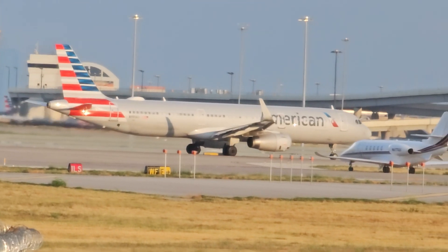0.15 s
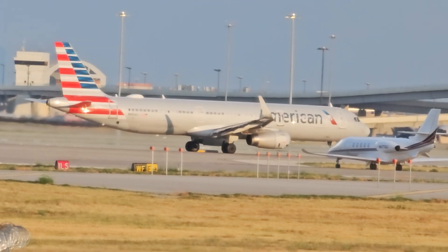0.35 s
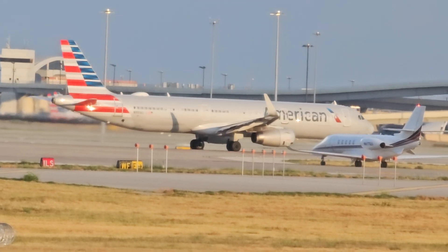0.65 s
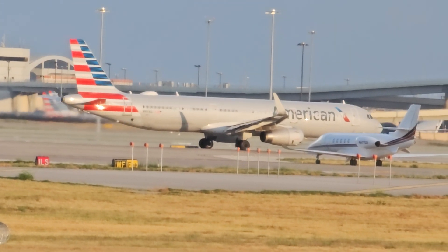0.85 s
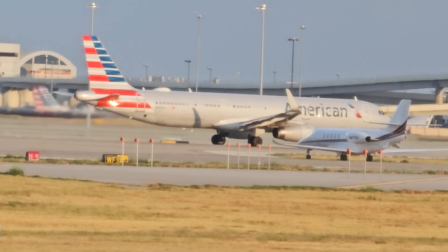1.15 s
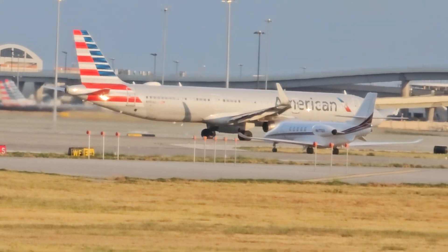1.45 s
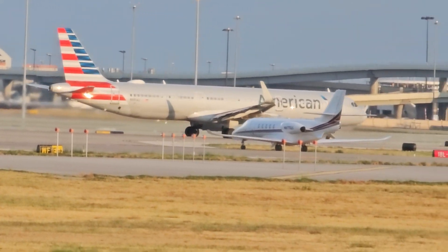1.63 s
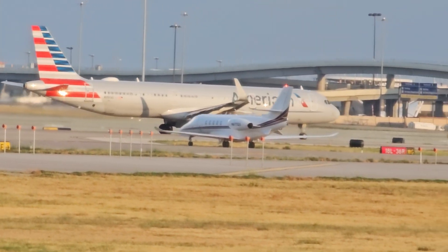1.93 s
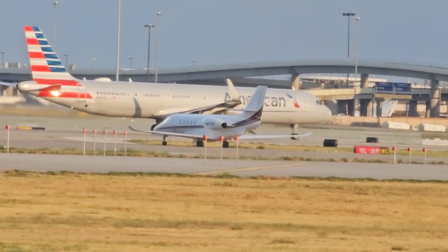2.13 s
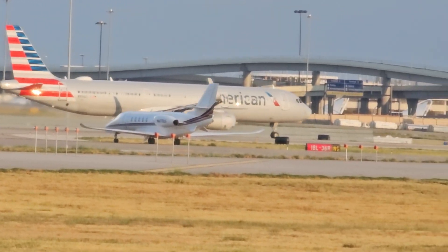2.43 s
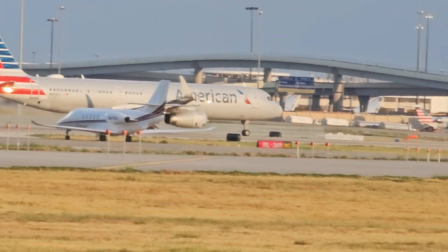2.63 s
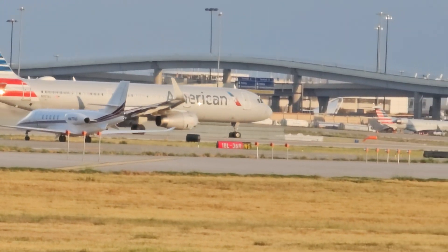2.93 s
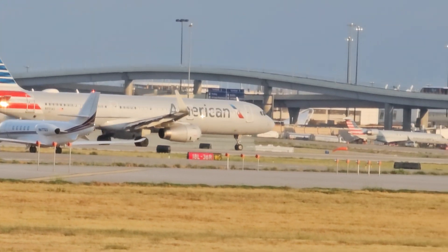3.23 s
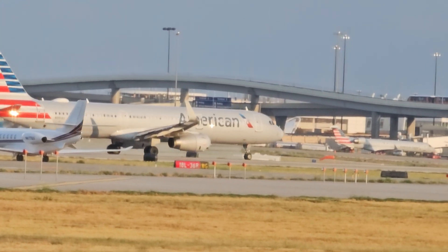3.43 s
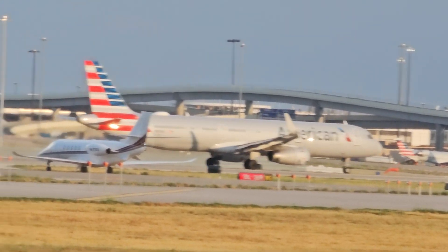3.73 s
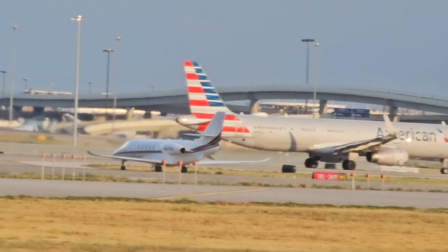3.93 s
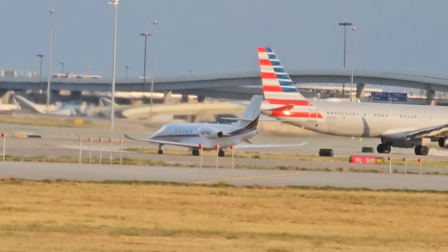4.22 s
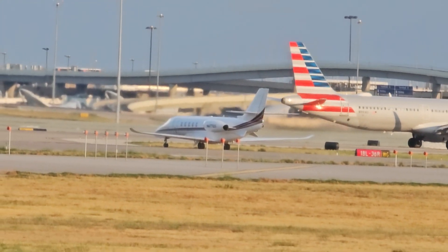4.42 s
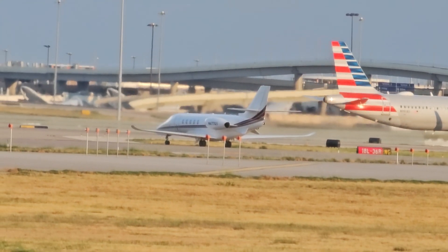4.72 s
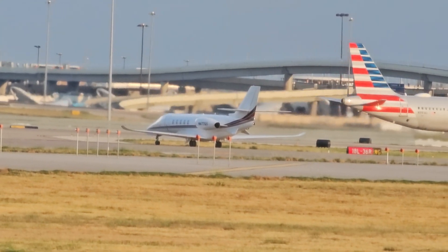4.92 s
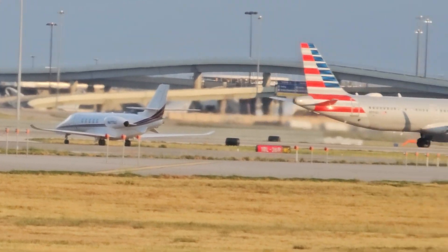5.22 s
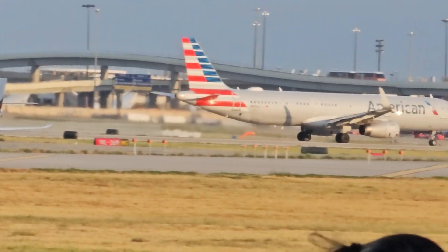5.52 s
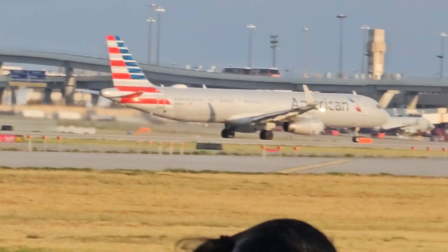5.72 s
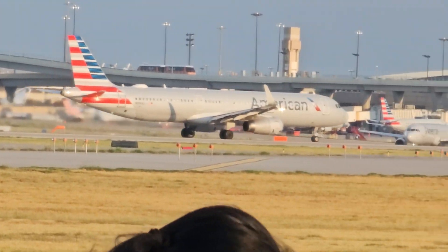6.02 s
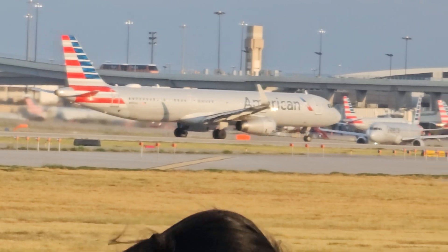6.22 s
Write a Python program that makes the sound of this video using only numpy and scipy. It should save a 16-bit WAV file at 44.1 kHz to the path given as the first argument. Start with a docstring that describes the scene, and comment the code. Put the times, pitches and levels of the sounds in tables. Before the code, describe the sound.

A distant airliner spools up, its rising whine giving way to a sustained roar with deep rumble and broad hiss.

```python
"""A dry grass field beside a runway, where a distant airliner opens its throttles and rolls.
Its fans whine upward and are masked by the turbulent exhaust: deep rumble, then roar and hiss coloured
by a ground reflection. Other engines idle to the right, and the roar echoes from that side.
A breeze rustles the grass and thumps the microphone; a limiter holds down the loudest swells."""
import sys
import numpy as np
from scipy import signal
from scipy.fft import rfft, irfft, next_fast_len
from scipy.io import wavfile
from scipy.ndimage import uniform_filter1d, minimum_filter1d, map_coordinates

SR = 44100
rng = np.random.default_rng(int(sys.argv[2]) if len(sys.argv) > 2 else 0)


def put_to_file(sound):
    """Save the sound as 16-bit audio at rate SR, in the file named by the first command-line argument."""
    columns = np.atleast_2d(sound).T  # one column per channel
    safe = np.clip(columns, -1, 1)
    whole_steps = np.round(safe * 32767)
    wavfile.write(sys.argv[1], SR, whole_steps.astype(np.int16))


N = 280476

# Correlation between the ears, in general and for sounds from the right: frequency_hz, coherence
COHERENCE = [(25, 0.82), (60, 0.91), (160, 0.97), (270, 1), (450, 0.87), (740, 1), (1220, 1), (2100, 0.95),
             (3400, 0.8), (5500, 0.48), (9000, .5)]
RIGHT_COHERENCE = [(100, .3), (400, 0.93), (2000, 0.63), (6000, 0.28), (15000, 0.23)]
# Spectra of wind on the microphone, grass and the idling engines' rush: frequency_hz, density_db
BUFFET_SPECTRUM = [(5, -43.5), (14, -17.5), (22, -2.5), (31, 1.5), (39, -1), (50, -3.5), (90, -48),
                   (300, -120)]
GRASS_SPECTRUM = [(1000, -61), (4000, -5), (6000, -2), (6900, -7), (8200, -3.5), (9200, 0.5), (10300, -7),
                  (11300, -3), (12000, -6), (14000, -9), (15800, -13)]
IDLE_SPECTRUM = [(40, -6), (110, 6), (200, 3), (290, 0), (400, 5), (560, -1.5), (780, -6), (900, -6.5),
                 (1050, -2.5), (1500, -11), (1950, -14), (2300, -8), (2650, -21), (3400, -19),
                 (4300, -18.5), (5200, -30), (9000, -68.5)]
# Puffs on the microphone, and one lull: centre_s, half_width_s, gain_db
MICROPHONE_PUFFS = [(.4, .06, 15), (1.91, .07, 9), (2.2, .13, 5), (2.58, .11, 8), (2.95, .15, 5),
                    (3.45, .15, 6), (4.3, .6, -5), (5.08, .08, 6), (6.2, .18, 7)]
# Gusts in the grass: centre_s, half_width_s, gain_db
GRASS_GUSTS = [(.88, 0.12, 2.5), (1.6, 0.15, 3), (2.0, .13, 2.5), (4.8, 0.65, 2.5)]
# Balance of the nearest tuft, on the right: frequency_hz, left_minus_right_db
TUFT_BALANCE = [(5000, -9.5), (6800, -4.5), (8200, -6), (9300, -10), (10500, -13.5), (11700, -1),
                (14000, -1.5), (15500, -7.5)]
# Single stalks flicking: start_s, level_db, left_minus_right_db
STALK_FLICKS = [(1.1029, -47, -5), (1.6633, -43.5, -6.5), (1.8622, -48, -8), (2.1752, -42, -2.5),
                (2.9949, -46, -7), (3.2615, -47.5, -9), (4.594, -47.5, -9.5), (4.7277, -44.5, -8),
                (4.8609, -46, -7), (5.1284, -45, -7)]
# Tones of the idling engines: pitch_hz, gain_db, phase_scatter_rad
IDLE_TONES = [(394, 5.5, .3), (768, 0, .6)]
# Those tones swelling on the wind: centre_s, half_width_s, gain_db
HUM_SWELLS = [(.26, .15, 8.5), (.6, .14, 10), (1.35, .26, 7), (2.3, .5, 7.5)]
# The fan whine swelling through the roar: centre_s, half_width_s, blade_tone_db, octave_db
WHINE_SWELLS = [(.2, .07, 6.5, 0), (.5, .07, 8, 0), (1.11, .06, 0, 9), (1.2, .06, 11.5, 3),
                (1.29, .09, 2.5, 8.5), (1.38, .075, 15.5, 1), (1.52, .085, 12.5, 7.5), (1.82, .13, 16.5, 4)]
# Spectra of the exhaust layers, large eddies to small: frequency_hz, density_db
DEEP_SPECTRUM = [(10, -59), (30, -19), (42, -8.5), (52, -5.5), (59, -3.5), (67, 0), (76, -5.5), (90, -6.5),
                 (130, -48), (400, -120)]
RUMBLE_SPECTRUM = [(30, -57.5), (70, -23.5), (88, -3.5), (105, 2), (118, -1), (138, -5.5), (165, -10),
                   (200, -17.5), (300, -55), (800, -120)]
BOOM_SPECTRUM = [(40, -72.5), (120, -14), (170, -6.5), (210, 0.5), (265, -1), (320, -6.5), (365, -12.5),
                 (420, -13.5), (700, -62.5), (2000, -120)]
ROAR_SPECTRUM = [(100, -50), (300, -2.5), (450, -6), (520, 0.5), (680, 1.5), (800, 1.5), (900, -3),
                 (1020, -9), (1130, -5), (1300, -4), (1650, -6.5), (1930, -12.5), (2150, -11),
                 (2400, -15.5), (2900, -43), (7000, -120)]
HISS_SPECTRUM = [(500, -79), (1500, -11), (2400, -5.5), (2900, 3.5), (3400, -1), (4000, -3), (4600, -10.5),
                 (5300, -17.5), (6200, -31), (7200, -44.5), (15000, -69.5)]
# Growth with thrust, by layer name: idle_db, full_db, middle_s, rise_s, turn_gain_db
THRUST_LEVELS = {"deep": (-39.5, -11, 1.16, 0.48, 1.5), "rumble": (-34, -15, 1.48, 0.44, 1),
                 "boom": (-42.5, -19, 1.06, 0.56, 4), "roar": (-40.5, -20.5, 1.5, 0.53, -2),
                 "hiss": (-51.5, -37, 1.78, 0.42, -2)}
# How far the nozzles point at the listener: time_s, turn_fraction
NOZZLE_TURN = [(3.3, 0), (3.9, 0.36), (4.4, 0.82), (5.2, 1), (5.6, 0.87), (6.36, 0.2)]
# Spectra drift up, then sink as the nozzles turn: time_s, rumble_ratio, boom_ratio, roar_ratio
FREQUENCY_DRIFT = [(0, 1.035, 1.03, 1.026), (1.5, 1.053, .98, 1.012), (2.4, 1.137, 1.06, 1),
                   (3.0, 1.167, 1.08, 1.02), (3.7, 1.14, 1.096, 1.026), (4.3, 1.05, 1.043, 0.99),
                   (4.8, .96, 0.99, 1), (5.3, .91, .87, .98), (5.7, .88, .93, .97),
                   (6.36, 0.91, 0.99, 0.98)]
# Surges of the plume: centre_s, half_width_s, deep_db, rumble_db, boom_db, treble_db
PLUME_SURGES = [(.04, .04, 3.5, 5.5, 1.5, 1), (.3, .025, 6, 6, -3, 1), (.39, .037, 7, 3, 4, -1.5),
                (.98, .03, 12, 2, 6, 0), (1.22, .03, -3, 0, 4, 0), (1.34, .034, 3, 5.5, 0, -.5),
                (1.59, .056, -5, 4, 3.5, 1), (1.76, .05, 4, 1, 1, 1.5), (1.91, .027, -4, 4.5, -.5, 1.5),
                (2.14, .028, 7, 4, 0, -.5), (2.39, .034, -3, 4, 2.5, .5), (2.49, .05, 2.5, 1, 0, 1.5),
                (2.66, .08, 4, 1, 0, .5), (2.81, .023, -1.5, 4, 0, -.5), (2.96, .05, -1, .5, 5, -.5),
                (3.11, .045, 2, -5, 0, .5), (3.225, .028, 2, 7, 1.5, 1.5), (3.32, .028, 4, 0, 0, .7),
                (3.42, .035, 5, 0, 0, 1.3), (3.51, .025, 2, 4, 0, 1), (3.61, .05, 4, 1, 0, 1),
                (3.8, .045, 0, 3.5, 4.5, .6), (4.16, .028, 6, 1, 0, 0), (4.24, .045, 0, 2, 4, 0),
                (4.53, .045, -2, 2, 3, 0), (4.66, .04, 5.5, 0, 0, 0), (4.98, .05, 1, 0, 2.5, 0),
                (5.22, .08, 1, 5, 0, 0), (5.32, .025, 0, 1, 5, 0), (5.6, .042, 4.2, -3.5, -3, 0),
                (5.74, .028, -1, 5, 0, 0), (5.97, .035, 1.5, 5, 0, .5), (6.07, .035, 3.5, 1, 1, .5),
                (6.26, .028, -1.5, 4.5, 1, 1)]
# Wind refracting the sound away: centre_s, half_width_s, bass_db, boom_db, treble_db
REFRACTION_FADES = [(.13, .03, -5, 0, 0), (.53, .045, -6, -1.5, -3), (.76, .046, -8, -1.5, -3),
                    (1.24, .03, -4, 0, -1), (2.2, .02, -6, -1, 0), (2.3, .02, -5, 0, 0),
                    (3.03, .025, -6, 0, 0), (4.58, .02, -5, 0, 0), (3.91, 0.047, -15, -10, -1),
                    (4.02, .026, -12, -2, -.5), (5.45, 0.07, -7, -3, -0.5)]
# Treble lift at the closest approach: centre_s, half_width_s, gain_db
CLOSEST_APPROACH = [(3.7, 1.1, 5)]
# Echo from the right, relative to the direct sound: frequency_hz, gain_db
ECHO_RESPONSE = [(400, -13.5), (750, -21), (1100, -12), (2000, -9.5), (3500, -6), (6000, -1)]

JET_LEAD_S, RIGHT_LEAD_S = .000048, -.00047  # how much sooner the left ear hears each side
TIME_S = np.arange(N) / SR
EAR_SPLIT = np.array([[.5], [-.5]])  # shares a difference between left and right


def amp(db):
    """Amplitude grows tenfold every 20 decibels."""
    return 10 ** (np.asarray(db) / 20)


def unit(x):
    """Normalisation to an rms of 1."""
    return x / np.sqrt(np.mean(x ** 2) + 1e-20)


def along(points, hz):
    """Interpolation of (frequency_hz, value) points on a logarithmic frequency axis."""
    knots_hz, values = np.transpose(points)
    return np.interp(np.log(hz + 1), np.log(knots_hz + 1), values)


def curves(rows):
    """Linear interpolation in time: one curve for each column after the first."""
    times_s, *columns = np.transpose(rows)
    return [np.interp(TIME_S, times_s, column) for column in columns]


def rise(low, high, middle_s, rise_s):
    """A sigmoid transition from low to high."""
    return low + (high - low) * (1 + np.tanh((TIME_S - middle_s) / (2 * rise_s))) / 2


def swells(rows):
    """Superposed Gaussian swells: one decibel curve for each level column."""
    rows = np.array(rows)
    centre_s, half_width_s, gains_db = rows[:, :1], rows[:, 1:2], rows[:, 2:]
    return gains_db.T @ np.exp(-((TIME_S - centre_s) / half_width_s) ** 2)


def wobble(rate_hz):
    """Random modulation: a spline through rate_hz Gaussian values a second."""
    knots = rng.standard_normal(int(N * rate_hz / SR) + 4)
    return map_coordinates(knots, [TIME_S * rate_hz])


def filtered(x, response):
    """Linear filtering multiplies the spectrum by a complex frequency response."""
    size = next_fast_len(N + SR // 2)
    return irfft(rfft(x, size) * response(np.fft.rfftfreq(size, 1 / SR)), size)[..., :N]


def low_pass(x, edge_hz, order):
    """A Butterworth magnitude response attenuates the band above edge_hz."""
    return filtered(x, lambda hz: 1 / np.sqrt(1 + (hz / edge_hz) ** (2 * order)))


def glide(x, ratio):
    """Resampling scales every frequency by the same changing ratio."""
    return np.array([map_coordinates(ear, [np.cumsum(ratio)], mode="mirror") for ear in x])


def steadied(x, samples):
    """Division by the running rms levels slow swells and keeps the fast churning."""
    power = uniform_filter1d(np.mean(x ** 2, axis=0), samples)
    power = uniform_filter1d(power, samples // 2)
    return x / np.sqrt(np.abs(power) + 1e-9)


def turbulence(spectrum, patchy_db, coherence=COHERENCE):
    """Partially coherent stereo noise of rms 1, its gain patchy in time and frequency."""
    bins = signal.stft(rng.standard_normal((2, N)), nperseg=512)[2]
    patches = uniform_filter1d(rng.standard_normal(bins.shape[1:]), size=6, axis=0)
    patches = unit(uniform_filter1d(patches, size=16, axis=1))
    pair = signal.istft(bins * amp(patchy_db * patches), nperseg=512)[1][:, :N]

    def mid_side_gains(hz):
        """Lower coherence moves power from the ears' sum to their difference."""
        angle = np.arccos(np.clip(along(coherence, hz), -1, 1)) / 2
        return amp(along(spectrum, hz)) * [np.cos(angle), np.sin(angle)]

    mid, side = filtered(pair, mid_side_gains)
    return unit(np.array([mid + side, mid - side]))


def localised(x, lead_s, tilt_db):
    """Interaural time and level differences give direction; positive values favour the left."""
    gains = amp(EAR_SPLIT * tilt_db)
    return filtered(x, lambda hz: gains * np.exp(2j * np.pi * hz * EAR_SPLIT * lead_s))


def wind_buffet():
    """Pressure fluctuations in a freshening breeze thump the microphone below the rumble."""
    level_db = rise(-42, -25.5, middle_s=1.4, rise_s=.2) + swells(MICROPHONE_PUFFS)[0] + 2 * wobble(7)
    return amp(level_db) * steadied(turbulence(BUFFET_SPECTRUM, patchy_db=2), samples=8000)


def grass():
    """Dry blades shiver as amplitude-modulated noise; single stalks flick with exponential decay."""
    level_db = rise(-62.5, -56.7, middle_s=1.15, rise_s=.3) + swells(GRASS_GUSTS)[0] + .3 * wobble(9)
    shiver_db = .9 * wobble(60) + 1.5 * wobble(300)
    blades = amp(shiver_db) * turbulence(GRASS_SPECTRUM, patchy_db=1, coherence=RIGHT_COHERENCE)
    tuft = unit(filtered(blades, lambda hz: amp(EAR_SPLIT * along(TUFT_BALANCE, hz))))
    rustle = amp(level_db) * tuft
    scrape = turbulence([(3000, -37.5), (8500, .5), (15800, -2.5)], patchy_db=2.5)
    for start_s, flick_db, balance_db in STALK_FLICKS:
        decay = (TIME_S >= start_s) * np.exp(-np.abs(TIME_S - start_s) / .0015)
        rustle += amp(flick_db + EAR_SPLIT * balance_db) * decay * scrape
    return rustle


def engine_tone(hz, flutter_db, scatter_rad):
    """Scintillation: turbulent air shakes a tone's level and phase, a little differently at each ear."""
    phase = 2 * np.pi * np.cumsum(hz) / SR + scatter_rad * wobble(30)
    ears = np.array([np.sin(phase + scatter_rad / 2 * wobble(12)) for _ in range(2)])
    return unit(ears * amp(flutter_db * wobble(12)))


def idling_engines():
    """Tonal and broadband noise superpose: a hum that swells on the wind, in a steady rush."""
    hum = sum(amp(gain_db) * engine_tone(np.full(N, hz), flutter_db=2, scatter_rad=scatter)
              for hz, gain_db, scatter in IDLE_TONES)
    rush = turbulence(IDLE_SPECTRUM, patchy_db=1.3, coherence=RIGHT_COHERENCE)
    return amp(-50.3 + swells(HUM_SWELLS)[0]) * hum + amp(-35.5) * rush


def fans():
    """The blade-passing tones of two detuned fans climb with shaft speed; turbulence smears the octave."""
    blade_hz = rise(1290, 1860, middle_s=1.38, rise_s=.42)
    whine_db, octave_db = swells(WHINE_SWELLS)
    near = engine_tone(blade_hz, flutter_db=1.2, scatter_rad=.45)
    far = amp(-9) * engine_tone(1.012 * blade_hz, flutter_db=3, scatter_rad=1.2)
    octave_hz = 2 * blade_hz * (1 + .005 * wobble(220))
    octave = engine_tone(octave_hz, flutter_db=1.8, scatter_rad=1.1)
    return amp(-56.5 + whine_db) * (near + far) + amp(-63.3 + octave_db) * octave


def building_reflection(x, lag_s=.0298, strength=.22):
    """Comb filtering: a late copy off buildings adds closely spaced peaks and notches."""
    return filtered(x, lambda hz: 1 + strength * np.exp(-2j * np.pi * hz * lag_s))


def ground_reflection(x, lag_s=.001344, strength=.12, absorb_hz=3700):
    """Interference with a ground bounce, weaker in the treble, adds widely spaced peaks and notches."""
    bounce = lambda hz: strength / (1 + (hz / absorb_hz) ** 2) * np.exp(-2j * np.pi * hz * lag_s)
    return unit(filtered(x, lambda hz: 1 + bounce(hz)))


def with_echo(x, lag_s=.11):
    """A long reflection path returns the sound from the right, late and brighter than it went."""
    echo = filtered(x, lambda hz: amp(along(ECHO_RESPONSE, hz)) * np.exp(-2j * np.pi * hz * lag_s))
    return unit(x + localised(echo, lead_s=RIGHT_LEAD_S - JET_LEAD_S, tilt_db=0))


def approach_brightening(x):
    """Air absorption is least on the shortest path, so the treble lifts at the closest approach."""
    dull = low_pass(x, edge_hz=4650, order=6)
    return dull + amp(swells(CLOSEST_APPROACH)[0]) * (x - dull)


def layer_db(name):
    """An exhaust layer grows with thrust; directivity shifts its level as the nozzles turn."""
    *climb, turn_gain_db = THRUST_LEVELS[name]
    return rise(*climb) + turn_gain_db * curves(NOZZLE_TURN)[0]


def exhaust(throb_db=1.2, throb_hz=14):
    """Jet mixing noise: large eddies rumble, small ones hiss; the plume surges and refraction fades it."""
    deep_surge, rumble_surge, boom_surge, treble_surge = swells(PLUME_SURGES)
    bass_fade, boom_fade, treble_fade = swells(REFRACTION_FADES)
    rumble_ratio, boom_ratio, roar_ratio = curves(FREQUENCY_DRIFT)

    deep = turbulence(DEEP_SPECTRUM, patchy_db=1.5)
    deep = steadied(building_reflection(deep), samples=2600)
    deep *= amp(layer_db("deep") + deep_surge + bass_fade + throb_db * wobble(throb_hz))

    rumble = glide(turbulence(RUMBLE_SPECTRUM, patchy_db=1.5), rumble_ratio)
    rumble = steadied(building_reflection(rumble), samples=2600)
    rumble *= amp(layer_db("rumble") + rumble_surge + bass_fade + throb_db * wobble(throb_hz))

    boom = glide(turbulence(BOOM_SPECTRUM, patchy_db=-1.05), boom_ratio)
    boom = low_pass(boom, edge_hz=387, order=16)  # soft ground absorbs the band above
    boom = steadied(building_reflection(boom), samples=3500)
    boom *= amp(layer_db("boom") + boom_surge + boom_fade + .7 * wobble(throb_hz))

    roar = glide(turbulence(ROAR_SPECTRUM, patchy_db=.7), roar_ratio)
    hiss = turbulence(HISS_SPECTRUM, patchy_db=1.3)
    roar, hiss = with_echo(ground_reflection(np.array([roar, hiss])))
    treble = amp(layer_db("roar")) * roar + amp(layer_db("hiss")) * approach_brightening(hiss)
    treble *= amp(treble_surge + treble_fade + .14 * wobble(6.5))
    return deep + rumble + boom + treble


def scene():
    """Superposition of the jet slightly left, idling engines and grass to the right, and the wind."""
    jet = localised(exhaust() + fans(), lead_s=JET_LEAD_S, tilt_db=.5)
    background = localised(idling_engines() + grass(), lead_s=RIGHT_LEAD_S, tilt_db=.6)
    return jet + background + wind_buffet()


def limiter(x, ceiling, samples):
    """Look-ahead limiting lowers the gain smoothly before each peak that would pass the ceiling."""
    safe_gain = np.minimum(1, ceiling / (np.abs(x).max(axis=0) + 1e-9))
    held_gain = minimum_filter1d(safe_gain, 2 * samples)
    return x * uniform_filter1d(uniform_filter1d(held_gain, samples), samples)


def record(dry):
    """Peak limiting, tapered ends and a sharp band limit."""
    limited = limiter(dry * amp(.5), ceiling=1, samples=200)
    taper = signal.windows.tukey(N, .002)
    return filtered(taper * limited, lambda hz: hz < 15780)


dry = scene()
out = record(dry)
put_to_file(out)
```